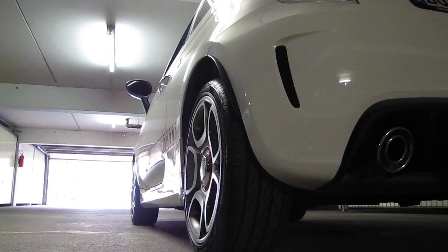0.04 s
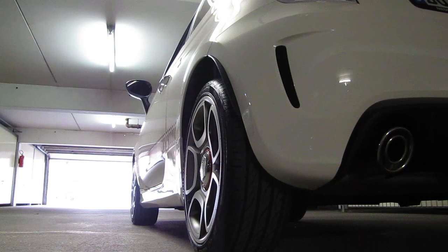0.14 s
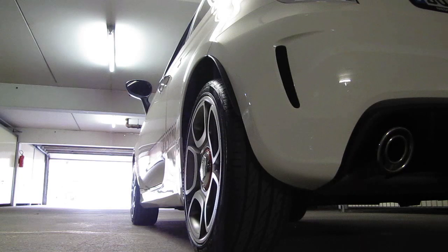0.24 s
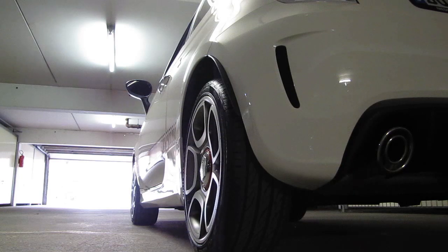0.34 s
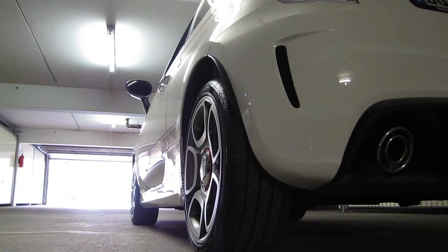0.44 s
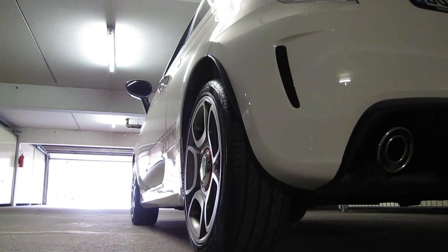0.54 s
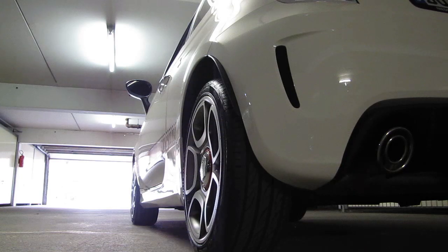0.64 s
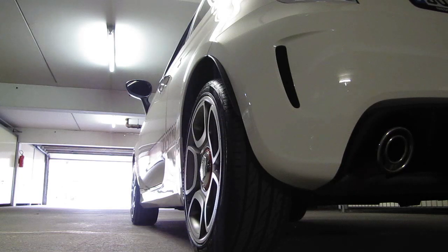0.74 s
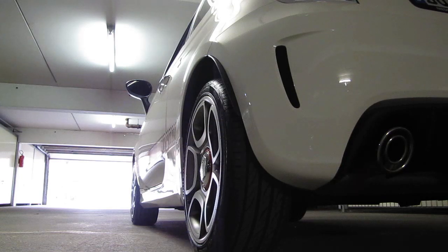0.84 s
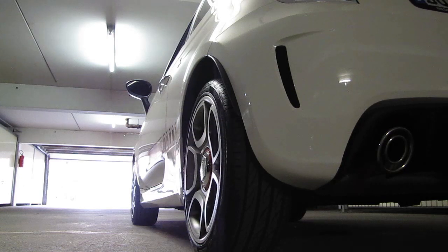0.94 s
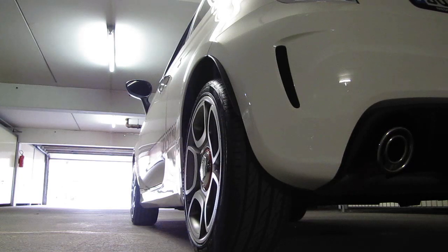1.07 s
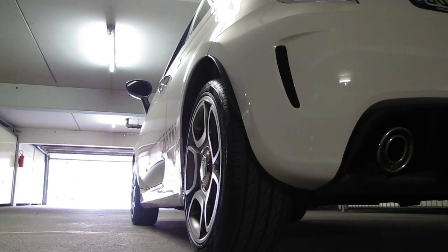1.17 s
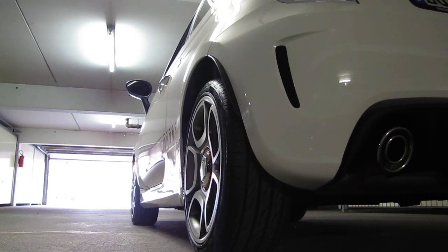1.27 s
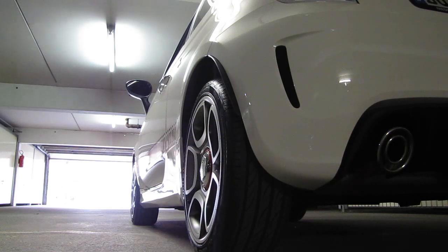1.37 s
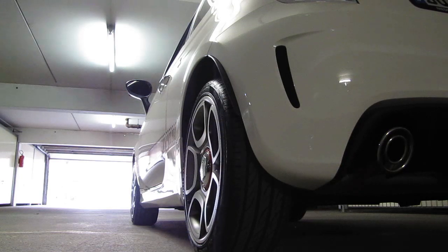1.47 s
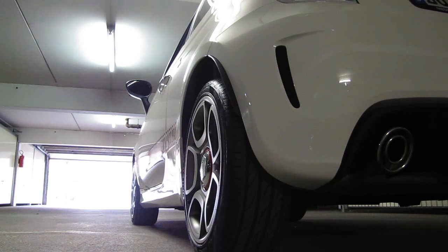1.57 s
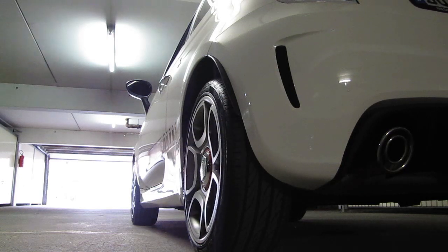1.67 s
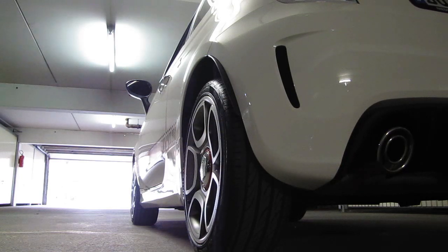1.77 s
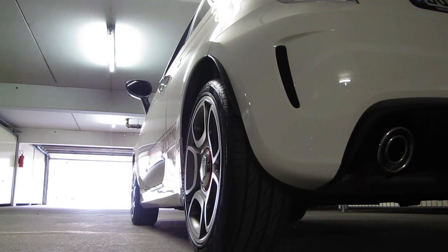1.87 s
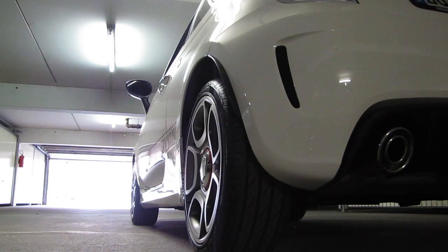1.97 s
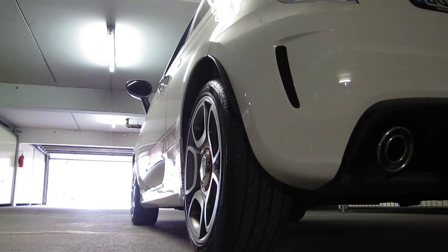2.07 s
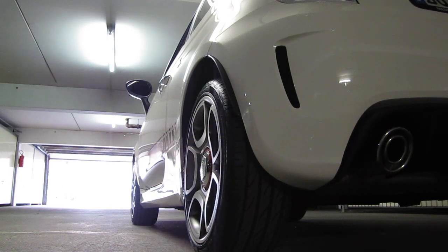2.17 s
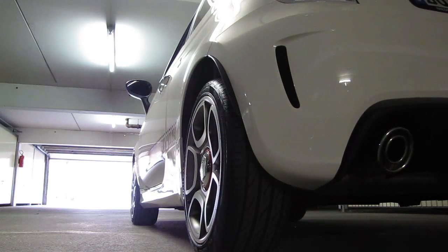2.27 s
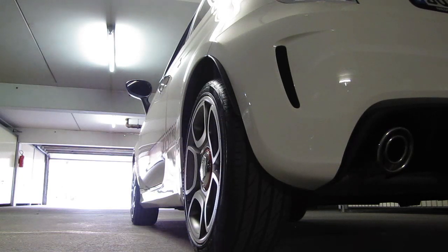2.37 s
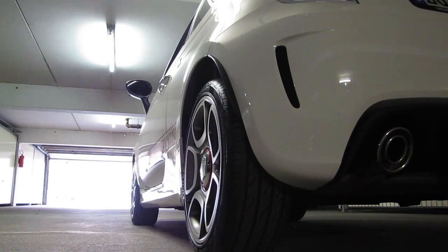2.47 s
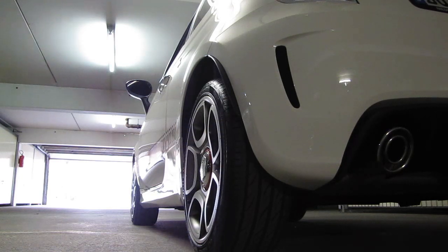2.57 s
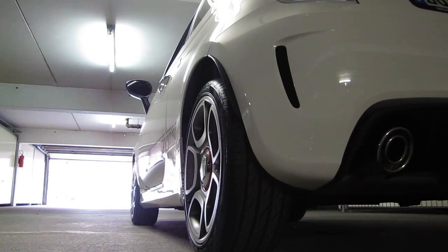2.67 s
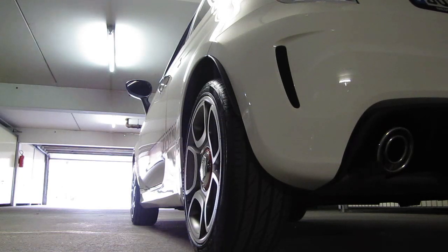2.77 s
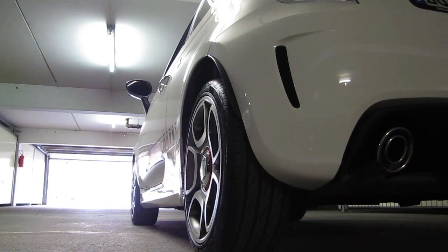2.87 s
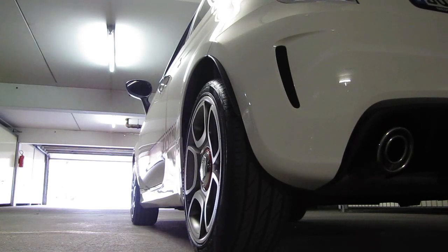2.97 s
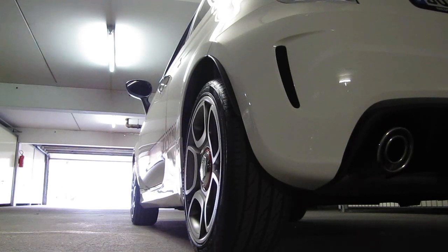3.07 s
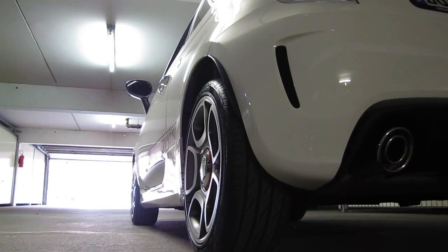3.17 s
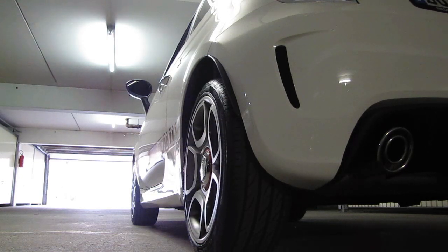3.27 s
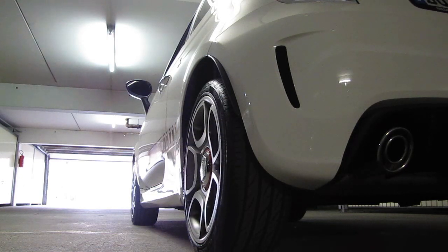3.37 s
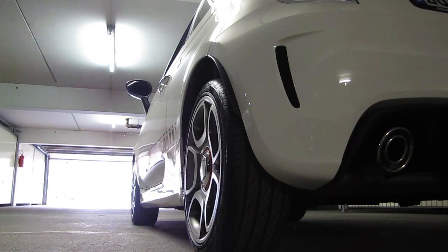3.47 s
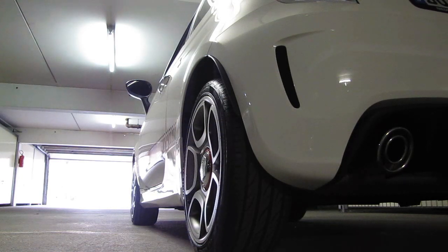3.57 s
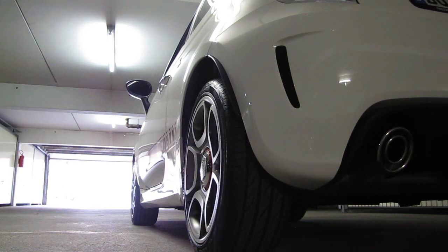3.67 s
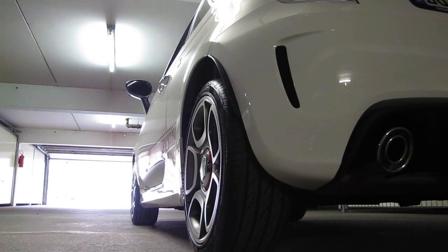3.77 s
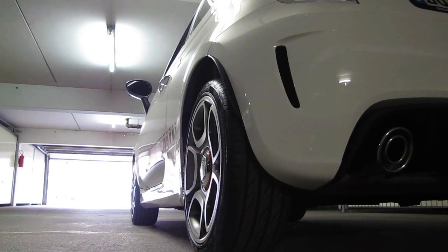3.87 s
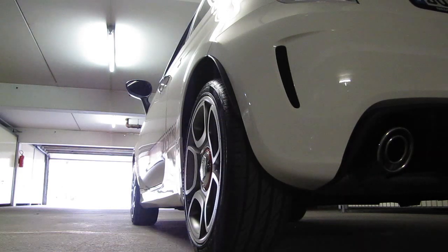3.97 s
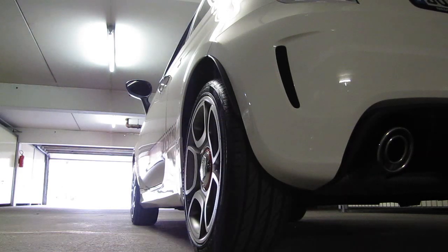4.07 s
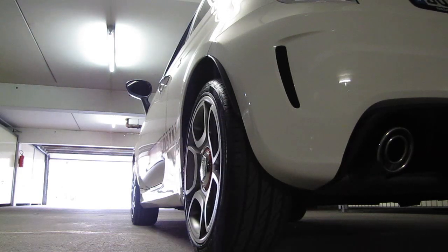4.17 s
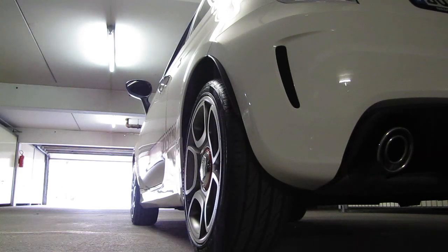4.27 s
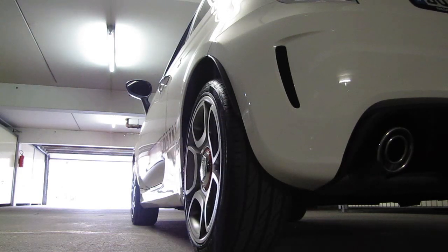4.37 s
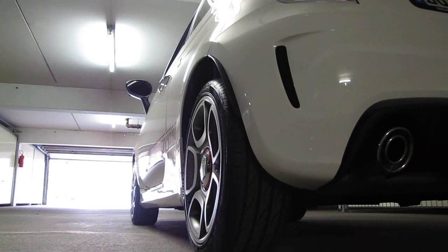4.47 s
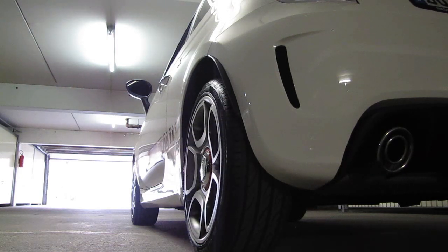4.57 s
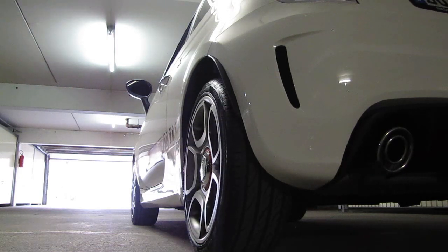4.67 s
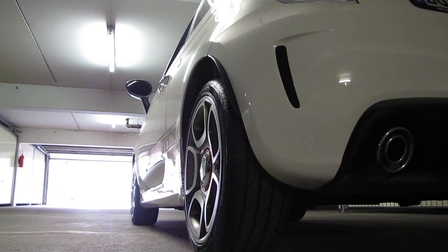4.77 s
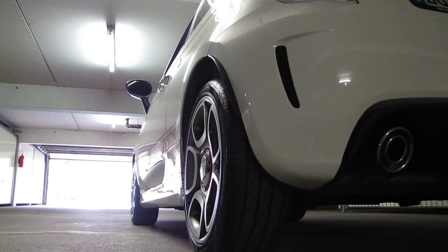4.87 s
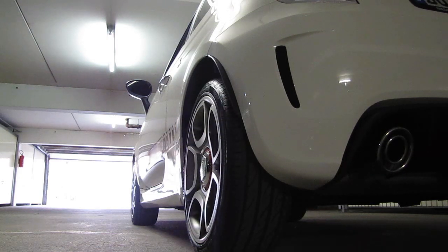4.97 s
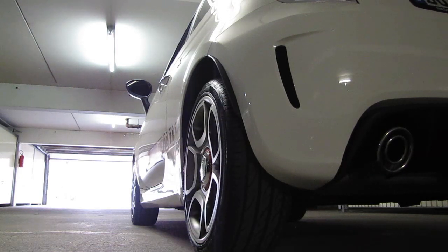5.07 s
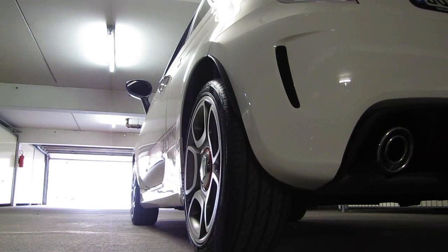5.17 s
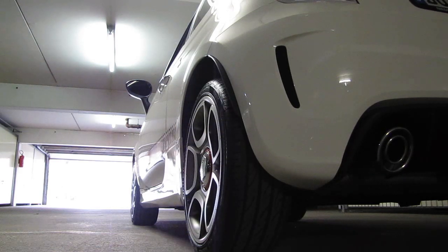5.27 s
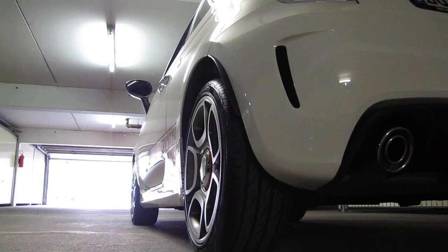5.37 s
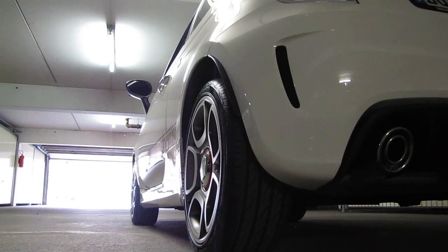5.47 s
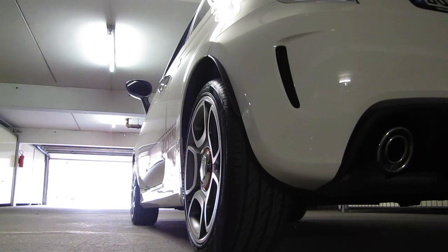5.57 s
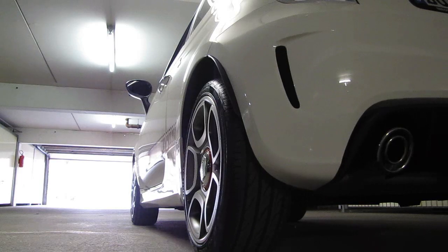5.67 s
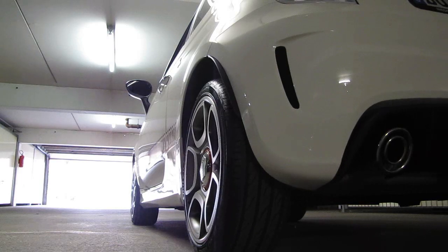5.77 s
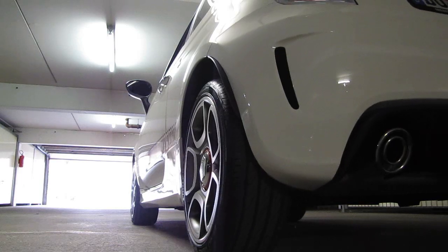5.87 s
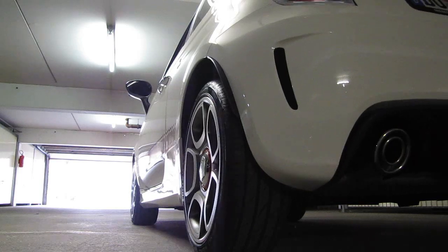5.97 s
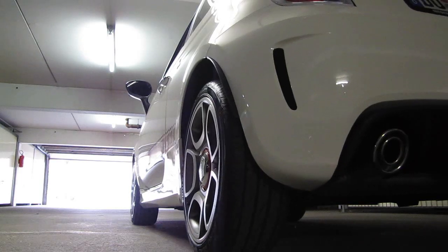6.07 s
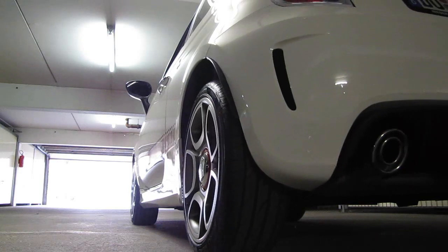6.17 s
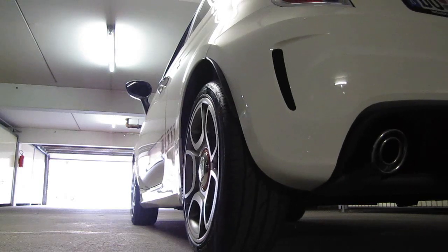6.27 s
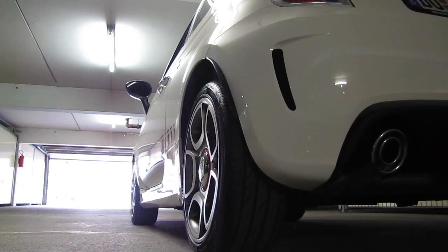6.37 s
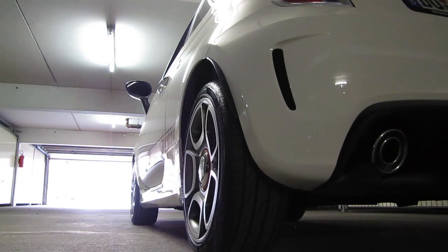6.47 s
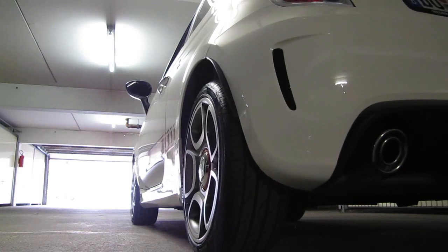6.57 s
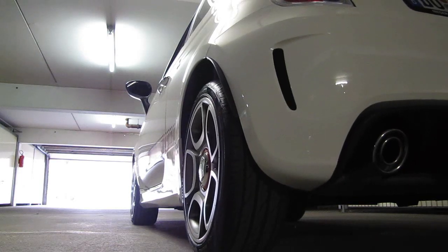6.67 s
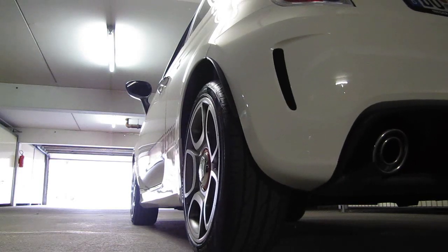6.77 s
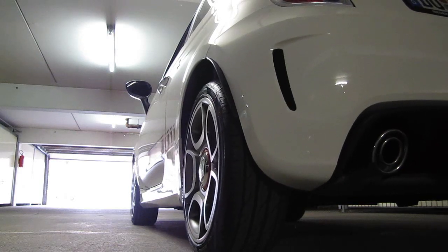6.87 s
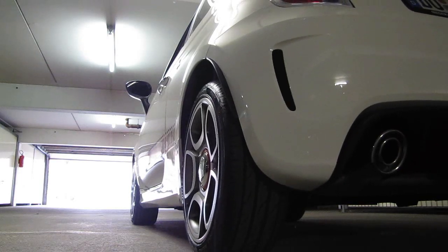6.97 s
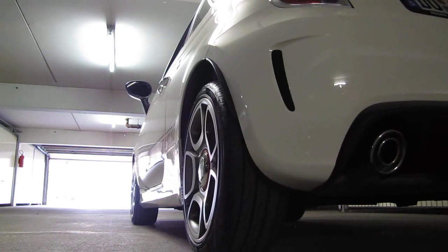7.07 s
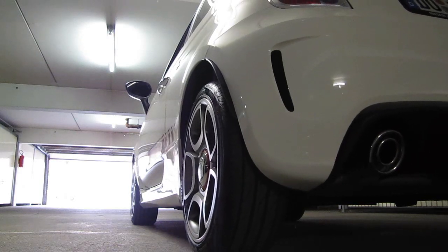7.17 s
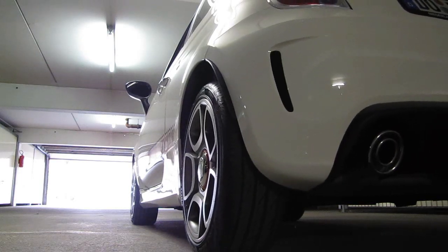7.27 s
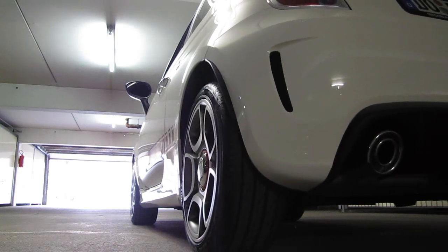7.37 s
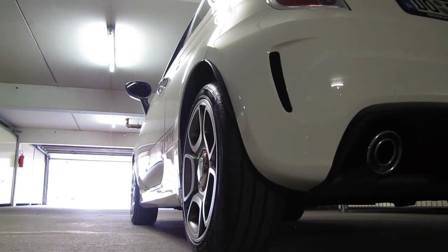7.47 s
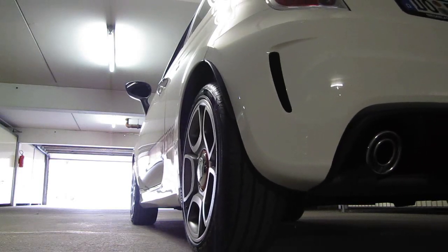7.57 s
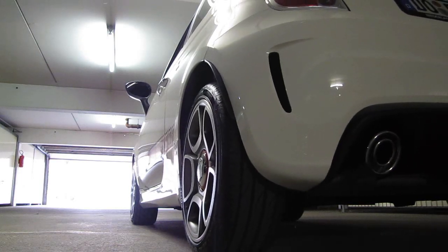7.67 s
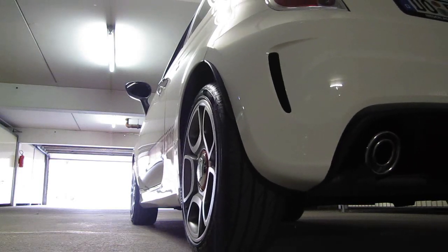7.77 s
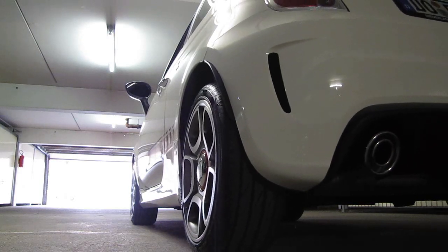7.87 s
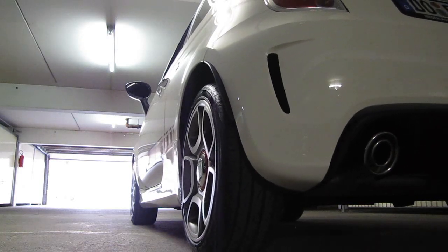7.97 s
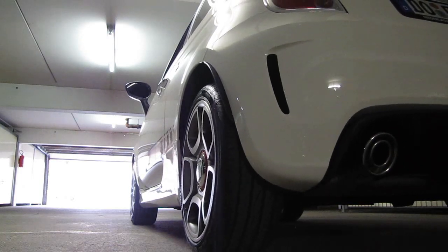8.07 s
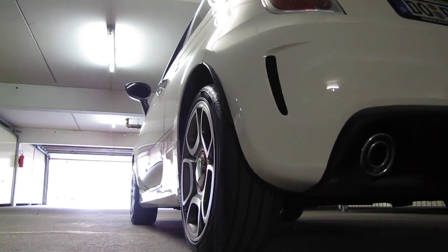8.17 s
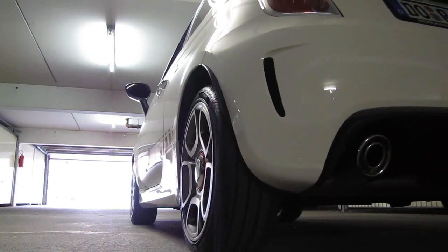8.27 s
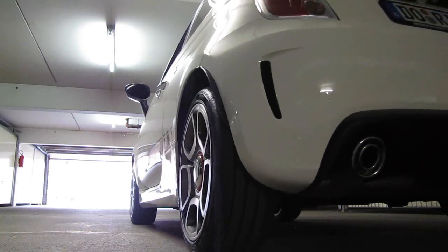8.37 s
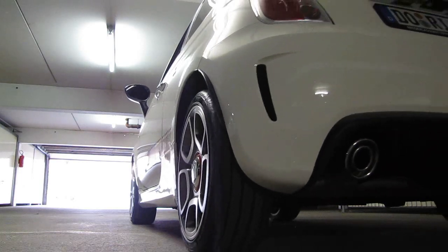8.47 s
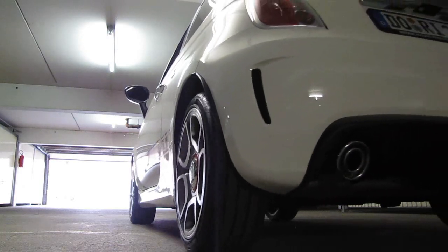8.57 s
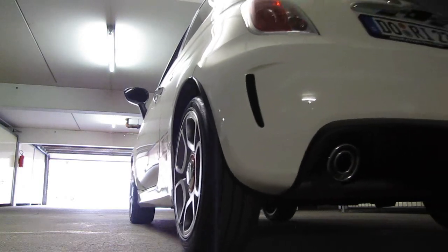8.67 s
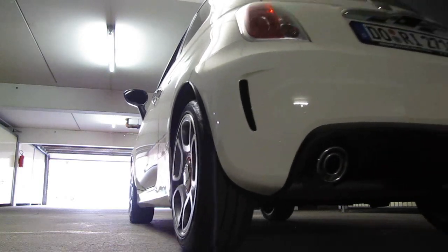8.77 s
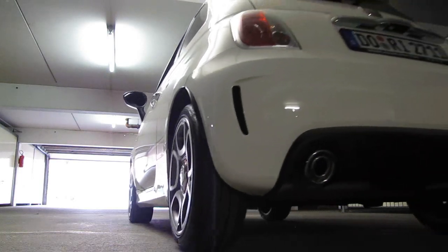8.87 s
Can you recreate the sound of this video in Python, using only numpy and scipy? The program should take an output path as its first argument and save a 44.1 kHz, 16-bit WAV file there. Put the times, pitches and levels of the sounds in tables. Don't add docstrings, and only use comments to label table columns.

```python
import sys
import numpy as np
from scipy import signal
from scipy.fft import rfft, irfft, next_fast_len
from scipy.io import wavfile
from scipy.ndimage import uniform_filter1d, map_coordinates

SR = 44100
rng = np.random.default_rng(int(sys.argv[2]) if len(sys.argv) > 2 else 0)


def log_audio(samples):
    frames = np.atleast_2d(samples).T
    limited = np.clip(frames, -1, 1)
    pcm = np.round(limited * 32767).astype(np.int16)
    wavfile.write(sys.argv[1], SR, pcm)


def volts_from_decibels(level):
    exponent = np.asarray(level, float) / 20
    return 10 ** exponent


N = 393813
T = np.arange(N) / SR

# start/s, end/s, f/Hz, level/dB
WHINES = [(0.087, 1.07, 2000, -73.5), (.09, 1.07, 4005, -84), (.09, 1.07, 6100, -80),
          (0.088, 1.07, 8010, -83), (0.08, 0.547, 201.6, -57), (0.083, 0.548, 401, -61),
          (0.074, 0.448, 604, -61), (0.08, .45, 800, -63), (2.75, 3.15, 15500, -66), (3.5, 4.1, 10400, -76),
          (3.6, 6.75, 5943, -57), (3.9, 6.7, 11881, -74), (6.75, 8.1, 5943, -63), (7.4, 8.052, 11881, -80),
          (4.197, 6.7, 7630, -69), (1.49, 1.72, 282, -38), (1.13, 1.42, 310, -63), (1.78, 2.1, 875, -41),
          (1.9, 2.14, 770, -43)]
# start/s, end/s
QUIET_S = (.092, 1.47)
# t/s, swell/dB
THUMPS = [
    (.13, 16),
    (.2, 8.5),
    (.5, 16.5),
    (.8, 4),
    (1.14, -6),
]
# t/s, swell/dB
STIRS = [
    (.14, 1.5),
    (.45, 4.5),
    (1.14, 4.5),
]
# f/Hz, level/dB
MURMUR = [(76, -28), (130, -2.5), (308, 1), (416, -3), (460, -13), (498, -3.5), (1500, -15), (2070, -17),
          (2580, -17), (15700, -27.5)]
# start/s, end/s, f/Hz, level/dB
SQUEALS = [(1.484, 1.465, 3990, 3), (1.506, 1.528, 1500, -31), (1.6, 1.65, 4850, -35),
           (1.76, 1.95, 3050, -33), (1.775, 2.025, 1512, -30.5), (1.9, 2.06, 3604, -33),
           (1.999, 2.03, 1830, -27), (1.125, 1.13, 453, -53), (6.98, 7.043, 2138, -32.5),
           (7.054, 7.12, 2287, -36), (8.336, 8.377, 2620, -37), (8.575, 8.5, 3486, -38),
           (8.82, 8.6, 3480, -43), (8.89, 7.9, 3490, -48), (8.51, 8.52, 3470, -44),
           (3.56, 3.59, 3170, -39.5)]
# f/Hz, t60/s
GARAGE = [(200, 1), (2000, 0.97), (8000, 0.26), (16000, 0.24)]
# t/s, peak level/dB, f/Hz, t60/s
KNOCKS = [(1.4167, -31.5, 4100, 0.33), (1.485, 0.5, 2620, 0.15), (1.5095, -5.5, 2100, 0.13),
          (1.6094, -10, 5100, 0.081), (1.733, -14.5, 2170, 0.23), (1.7778, -6, 2930, 0.055),
          (1.9003, -14.5, 3020, 0.12), (2.0093, -5.5, 3690, 0.11), (2.136, -5.5, 3493, 0.1),
          (2.391, -9, 4060, 0.23), (3.6638, -20.5, 4520, 0.086), (4.8239, -5.5, 2630, 0.19),
          (5.19, -16, 2710, 0.12), (5.7583, -19.5, 1410, 0.35), (6.1015, -20, 2600, 0.12),
          (6.9073, -28, 2100, 0.17), (8.502, -47, 2620, 0.11), (8.7786, -33, 2600, 0.12)]

# t/s, swell/dB
STROKES = [
    (1.488, 0),
    (1.522, 7.5),
    (1.62, 1),
    (1.795, 3.5),
    (1.912, 4.5),
    (2.04, 6),
    (2.135, 4.5),
]
# f/Hz, width/Hz, level/dB
GEARS = [(850, 12, -5), (1500, 42, -2), (1770, 180, -5.5), (2170, 14, -0.5), (3020, 54, -12.5),
         (3690, 25, -14.5), (4110, 130, -16), (5000, 33, -28.5)]
# f/Hz, level/dB per Hz
GRIND = [(290, -29.5), (500, -12.5), (852, -4.5), (929, -7), (1520, -6), (2410, -8.5), (3030, -7),
         (4880, -9), (15700, -34)]
# f/Hz, level/dB per Hz
PUMPING = [(12, -29.5), (20, -5.5), (61, 1.5), (118, -10.5), (274, -1.5), (365, 1.5), (520, -13), (600, -3),
           (780, -51), (1320, -120)]
# t/s, f/Hz
RUNDOWN = [
    (2.2, 8700),
    (2.29, 9650),
    (2.45, 9830),
    (2.56, 8800),
    (2.97, 5600),
    (3.31, 3250),
    (3.55, 2050),
]

# t/s, firings a second/Hz
SPEED = [(2.1, 19), (2.22, 39), (2.33, 45.2), (2.84, 37.8), (3.43, 34.1), (4.07, 27.15), (5.4, 27.37),
         (5.92, 27.6), (6.31, 33.6), (6.71, 28), (6.83, 29.6), (7.06, 45.3), (7.24, 50.6), (7.78, 34.4),
         (8.03, 35.6), (8.33, 50), (8.76, 54.1), (8.93, 52.8)]
# t/s, effort over idle/dB
EFFORT = [(2.1, 0), (2.16, 7), (2.28, -0.1), (3.45, 0.95), (4.12, -5.5), (4.75, 1.7), (5.7, -0.6),
          (5.95, -1.5), (6.17, 3.5), (6.45, 1.4), (6.68, -4.5), (6.79, -5.5), (6.87, 3.5), (7.15, 0.5),
          (7.5, 0.5), (8.0, 0.2), (8.45, 2), (8.93, -0.9)]
# t/s, swell/dB
BARKS = [(2.105, -10), (2.135, -7.5), (2.165, -6), (2.2, -1), (6.01, 3.5), (6.085, 4), (6.21, 5), (6.65, 2),
         (6.85, 7), (6.91, -4), (6.97, 3.5), (7.03, -7.5), (7.07, 4.5), (7.4, 3.5), (7.5, 1), (7.62, 5.5),
         (8.22, 4), (8.35, -2.5), (8.48, 6.5)]
# lag/ms, strength/dB
CYLINDERS = [(0, 0), (.4, -1), (1.69, -1), (2.1, 0)]
# f/Hz, level/dB
BOOM = [(12, -72), (27, 2), (35, 0.5), (43, 2.5), (52, 2.5), (64, 9), (82, 1.5), (92, -3), (107, 5),
        (135, -20), (163, -6), (192, -8), (220, -12), (262, -3.5), (300, -56.5), (900, -80)]
# f/Hz, width/Hz, level/dB
SILENCER = [(234, 21, -7), (261, 15.4, -5.5), (294, 9.2, 1), (311.6, 11.2, -3)]
# f/Hz, width/Hz, level/dB
TAILPIPE = [(353, 17.7, -8), (415.6, 22.4, -8), (587.4, 25.4, -19), (680.3, 10.6, -19), (766, 12, -26.5),
            (868, 3, -32.5)]
# f/Hz, level/dB per Hz
RUSH = [(260, -4.5), (450, 1), (485, -8.5), (579, -4.5), (746, -16), (840, -9.5), (1200, -12.5),
        (1460, -12.5), (2270, -20), (2560, -19), (3200, -21), (5790, -26.5), (6530, -31), (7800, -31.5),
        (15700, -47)]
# f/Hz, width/Hz, level/dB
SHIELDS = [(1010, 38, -4), (1377, 37, -4.5), (1798, 18, -3), (2100, 12, -2), (2275, 130, -10.5),
           (2620, 25, -6.5), (2932, 37, -12), (3450, 40, -19), (6080, 25, -17.5), (6450, 170, -25)]
# f/Hz, width/Hz, level/dB
UNDERTRAY = [(680, 610, 1), (1500, 850, -5.5), (2520, 540, -11), (6900, 370, -20.5)]

# f/Hz, likeness (1 = same)
ALIKE = [(30, .985), (130, .98), (300, .98), (600, .95), (1200, .82), (2400, .68), (5000, .35),
         (15000, .15)]
# f/Hz, left minus right/dB
LEAN = [(60, .6), (180, -.2), (550, -.6), (1650, -2), (4970, -1.3), (15000, -1.6)]


def unit(x):
    return x / np.sqrt(np.mean(x ** 2) + 1e-20)


def steady(x, span):
    size = int(span * SR)
    power = uniform_filter1d(uniform_filter1d(x ** 2, size), size)
    return x / np.sqrt(np.abs(power) + 1e-9 * np.mean(x ** 2))


def along(points, hz):
    f, v = np.transpose(points)
    return np.interp(np.log(hz + 1), np.log(f + 1), v)


def gate(start, end, fade):
    return np.clip((T - start) / 0.0038, 0, 1) * np.clip((end + fade - T) / fade, 0, 1)


def curves(rows, fade=0.01):
    s, *columns = np.transpose(rows)
    return [gate(s[0], s[-1], fade)] + [np.interp(T, s, column) for column in columns]


def swells(rows, rise, fall):
    return sum(db * np.exp(-((T - s) / np.where(T < s, rise, fall)) ** 2) for s, db in rows)


def wobble(rate):
    return map_coordinates(rng.standard_normal(int(N * rate / SR) + 4), [T * rate])


def filtered(x, response):
    m = next_fast_len(N + SR)
    return irfft(rfft(x, m) * response(np.fft.rfftfreq(m, 1 / SR)), m)[..., :N]


def causal(points):
    def response(hz):
        cepstrum = irfft(np.log(volts_from_decibels(np.maximum(along(points, hz), -80))))
        half = len(cepstrum) // 2
        cepstrum[1:half] *= 2
        cepstrum[half + 1:] = 0
        return np.exp(rfft(cepstrum))
    return response


def modes(table):
    def response(f):
        total = 0
        for k, (centre, width, db) in enumerate(table):
            peak = 1j * f * width / (centre * centre - f * f + 1j * f * width)
            total = total + (-1) ** k * volts_from_decibels(db) * peak
        return total
    return response


def noise(points):
    return unit(filtered(rng.standard_normal(N), lambda hz: volts_from_decibels(along(points, hz))))


def pulses(times, sizes):
    places = np.clip(np.round(times * SR).astype(int), 0, N - 1)
    return np.bincount(places, sizes, N)


def loose(drive, table, rate, depth_db):
    total = 0
    for centre, width, db in table:
        narrow = modes([(centre, 2.6 * width, 0)])
        part = filtered(drive, lambda hz: narrow(hz) ** 2)
        total = total + volts_from_decibels(db + depth_db * wobble(rate)) * part
    return total


def background():
    whines = 0
    for start, end, hz, db in WHINES:
        level = volts_from_decibels(db + 5 + 1.2 * wobble(10))
        whines = whines + gate(start, end, 0.05) * level * np.sin(2 * np.pi * hz * T)
    thump_db = -55.5 + swells(THUMPS, rise=0.05, fall=0.07)
    thump = filtered(rng.standard_normal(N), modes([(71.5, 17, -1), (110, 35, -7.5)]))
    thump = steady(thump, 0.05)
    murmur_db = -46.5 - 7 * T + swells(STIRS, rise=0.03, fall=0.06)
    murmur = filtered(noise(MURMUR), lambda hz: 1 / (1 + (hz / 1300) ** 4) ** 0.5)
    hiss = volts_from_decibels(-73) * 8 * filtered(noise(MURMUR), lambda hz: hz > 1000)
    quiet = volts_from_decibels(thump_db) * thump + volts_from_decibels(murmur_db) * murmur + hiss
    return whines + gate(*QUIET_S, 0.039) * quiet


def squeals():
    total = 0
    for start, end, hz, db in SQUEALS:
        level = volts_from_decibels(db + 3 + 5 * wobble(110))
        tone = np.sin(2 * np.pi * hz * T + wobble(90))
        total = total + gate(start, end, 0.025) * level * tone
    return total


def garage(x):
    hz, t, z = signal.stft(rng.standard_normal(SR), SR, nperseg=256)
    decay = volts_from_decibels(-60 * t / along(GARAGE, hz)[:, None])
    tail = signal.istft(z * decay, SR, nperseg=256)[1]
    late = np.pad(x, (500, 0))
    return signal.fftconvolve(late, tail / np.linalg.norm(tail))[:N]


def knocks():
    out, t = np.zeros(N + SR), T[:SR // 3]
    onset = 1 - np.exp(-t / 0.00069)
    for s, db, hz, t60 in KNOCKS:
        crack = 0.1 * np.diff(rng.standard_normal(len(t) + 1)) + rng.standard_normal(len(t))
        ring = 1.1 * np.sin(2 * np.pi * hz * t) * volts_from_decibels(-60 * t / 0.03)
        knock = (crack * volts_from_decibels(-60 * t / t60) + ring) * onset
        out[round(s * SR):][:len(t)] += volts_from_decibels(db - 11) * knock
    return filtered(out[:N], causal([(300, -13), (1500, 5), (3000, 3.5), (8000, -4.5), (16000, -23.5)]))


def starter():
    mesh_s, release_s, still_s = 1.476, 2.153, 3.37
    strain_db = swells(STROKES, rise=0.019, fall=0.029)
    since_release = T - release_s

    gear_db = -21.5 + strain_db - 23 * np.clip(since_release, 0, None)
    teeth = rng.standard_normal(N) * volts_from_decibels(3.7 * wobble(90))
    housing = unit(loose(teeth, GEARS, rate=14, depth_db=7.5))
    gear = unit(0.61 * housing + noise(GRIND) * volts_from_decibels(0.93 * wobble(60)))

    pump_db = -28 + strain_db + 2 * since_release
    pumping = gate(1.51, 2.08, 0.03) * volts_from_decibels(pump_db) * noise(PUMPING)

    free, hz = curves(RUNDOWN, fade=0.11)
    best_hz = 3600
    octaves_off = np.abs(np.log2(hz / best_hz)) * np.where(hz < best_hz, 2, 1)
    whine_db = -46.5 - 5 * octaves_off
    phase = 2 * np.pi * np.cumsum(hz * (1 + 0.012 * wobble(150))) / SR
    whine = 0
    for multiple, db in [(1, 4), (2, -9), (3, -15)]:
        level = volts_from_decibels(whine_db + db + 2.5 * wobble(40))
        whine = whine + level * (multiple * hz < 15700) * np.sin(multiple * phase)
    return gate(mesh_s, still_s, 0.36) * volts_from_decibels(gear_db - 0.5) * gear + pumping + free * whine


def engine():
    on, effort_db = curves(EFFORT)
    rate = uniform_filter1d(curves(SPEED)[1], SR // 14)
    turns = np.cumsum(rate * on) / SR + 0.9
    since_firing = turns % 1
    count = np.arange(1, int(turns[-1]) + 1)
    times = np.interp(count, turns, T)
    luck = rng.standard_normal((600, 3))[:len(count)]

    boom_db = -20 + effort_db
    flutter_db = 1.5 * wobble(9)
    ring_db = -17.5 + 0.79 * effort_db + flutter_db + swells(BARKS, rise=0.015, fall=0.02)
    rush_db = -43.5 + 0.25 * uniform_filter1d(effort_db, SR // 4)

    unloaded_hz, loaded_hz = 30.2, 51.6
    load = np.clip((rate - unloaded_hz) / (loaded_hz - unloaded_hz) + 0.18 * effort_db, 0, 1)
    load = load * np.clip((T - EFFORT[0][0]) / 0.3, 0, 1)

    even = pulses(times, volts_from_decibels(0.9 * luck[:, 0]))
    boom = filtered(0.006 * rng.standard_normal(N) - even, causal(BOOM))

    lag_ms, strength_db = np.transpose(CYLINDERS)[:, count % 4]
    uneven_times = times + (lag_ms + 0.08 * luck[:, 1]) / 1000
    uneven = pulses(uneven_times, volts_from_decibels(strength_db + 1.2 * luck[:, 2]))
    puff = uniform_filter1d(np.exp(-3 * since_firing), SR // 300)
    turbulence = (0.004 + 0.012 * load) * puff * rng.standard_normal(N)
    blast = turbulence - uneven - 0.63 * load * even
    low = filtered(blast, modes(SILENCER))
    high = filtered(blast, modes(TAILPIPE))
    ring = low + volts_from_decibels(-8 + 12 * load) * high
    ring = filtered(ring, lambda hz: 1 / (1 + 1j * hz / 1000) ** 2 / (1 + (205 / (hz + 1)) ** 8))
    ring = ring + 0.4 * garage(ring)

    exhaust = volts_from_decibels(boom_db) * steady(boom, 0.07) + volts_from_decibels(ring_db) * steady(ring, 0.15)
    tuned = np.clip((rate - 49) / 3, 0, 1)
    orders = 0.45 * np.sin(8 * np.pi * turns) + np.sin(10 * np.pi * turns)
    exhaust += tuned * volts_from_decibels(boom_db - 3) * orders

    rush = noise(RUSH) * (1 + 0.38 * puff) * volts_from_decibels(0.46 * wobble(14))
    shake = (0.54 + np.exp(-6 * since_firing)) * volts_from_decibels(1.6 * wobble(30)) * rng.standard_normal(N)
    shields = unit(loose(shake, SHIELDS, rate=12, depth_db=0.5))
    undertray = unit(filtered(shake, lambda hz: modes(UNDERTRAY)(hz) / (1 + (hz / 9000) ** 4)))
    rattle = steady(shields + 0.8 * undertray, 0.23)
    surge_db = np.clip(np.gradient(rate) * SR / 60, -1, 1)
    rattle_db = -36 + 8.5 * load + surge_db
    bay = volts_from_decibels(rush_db + 13.5) * rush + load * volts_from_decibels(rattle_db - 1.5) * rattle
    return on * exhaust, on * bay


def scattered(x):
    z = signal.stft(x, nperseg=1024)[2]
    drift = uniform_filter1d(rng.standard_normal(z.shape), 5, 0)
    drift = uniform_filter1d(drift, 5, 1)
    y = signal.istft(z * np.exp(2.5j * unit(drift)), nperseg=1024)[1][:N]
    return unit(y) * np.std(x)


def scene():
    exhaust, bay = engine()
    hits = knocks() + squeals()
    mid = exhaust + bay + starter() + hits + volts_from_decibels(-9) * garage(hits) + background()
    sign = np.array([[1], [-1]])

    def turn(hz):
        return np.arccos(np.clip(along(ALIKE, hz), 0, 1)) / 2

    def port(hz):
        bass_lag = 0.17 / (1 + (hz / 300) ** 2)
        lag = np.pi * hz * 3e-5 + bass_lag
        return volts_from_decibels(sign * along(LEAN, hz) / 2) * np.exp(-sign * 1j * lag)

    direct = filtered(mid, lambda hz: port(hz) * np.cos(turn(hz)))
    diffuse = filtered(scattered(mid), lambda hz: port(hz) * sign * np.sin(turn(hz)))
    return (direct + diffuse) * (T > 0.09)


def roll_off(x):
    return signal.sosfilt(signal.butter(12, 15830, fs=SR, output="sos"), x)


def record(dry):
    x = dry / (1 + np.abs(dry) ** 8) ** (1 / 8)
    x = filtered(x, lambda hz: hz < 15780)
    return roll_off(x)


dry = scene()
out = record(dry)
log_audio(out)
```